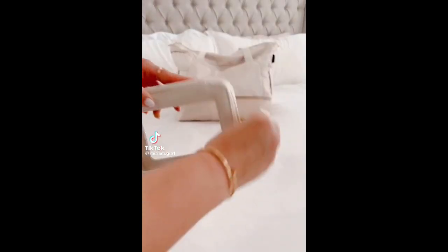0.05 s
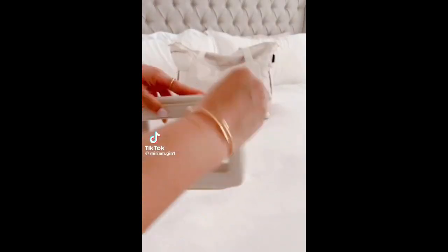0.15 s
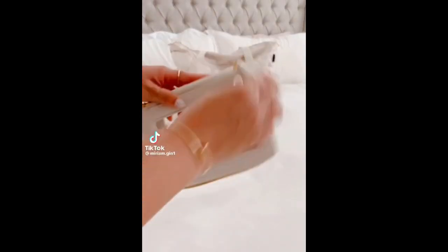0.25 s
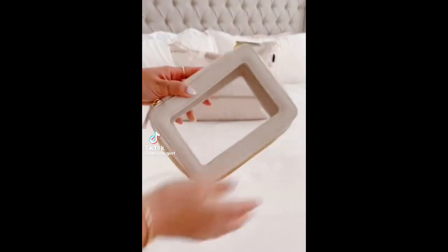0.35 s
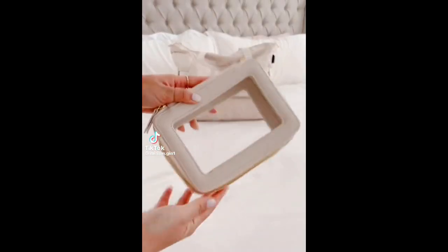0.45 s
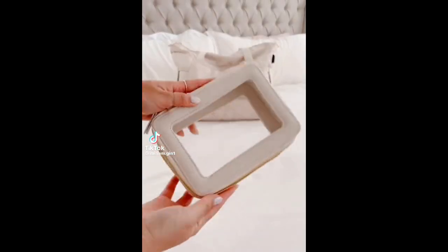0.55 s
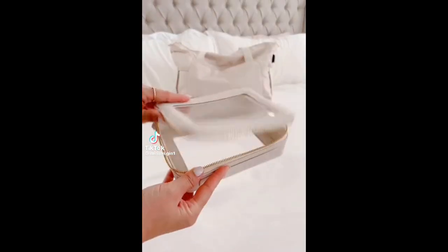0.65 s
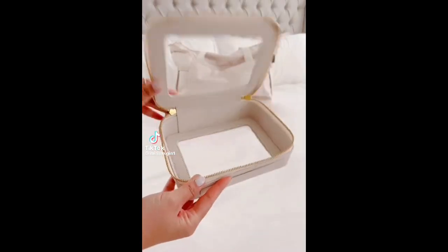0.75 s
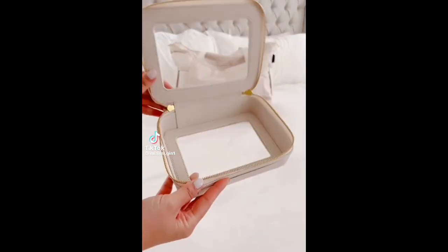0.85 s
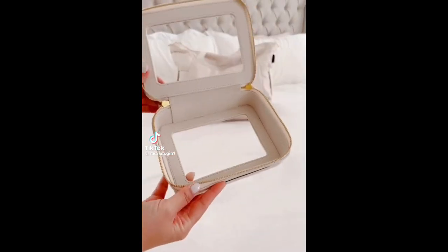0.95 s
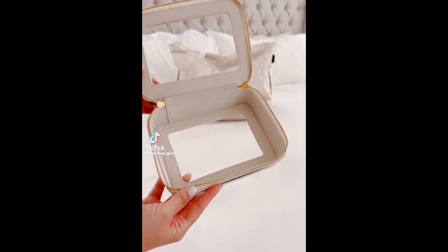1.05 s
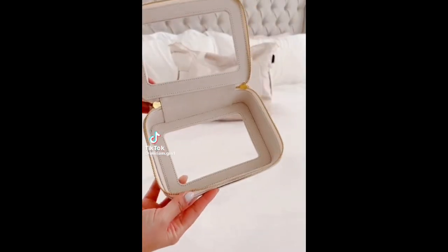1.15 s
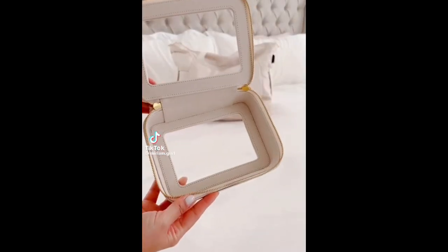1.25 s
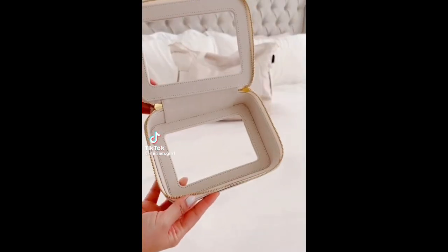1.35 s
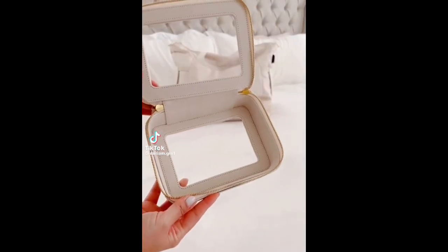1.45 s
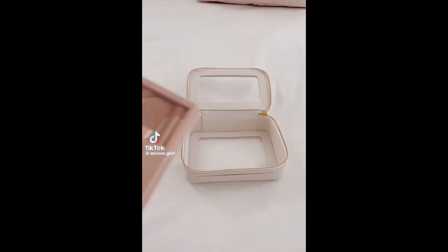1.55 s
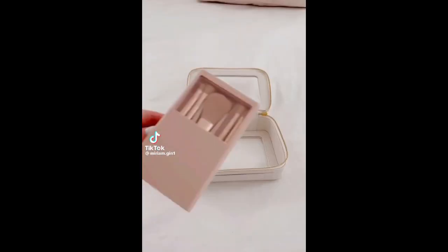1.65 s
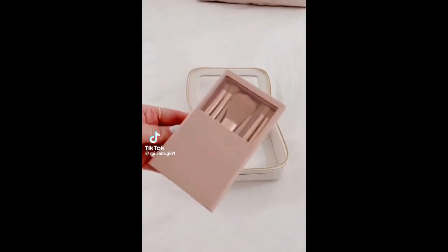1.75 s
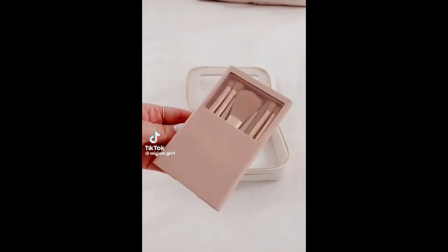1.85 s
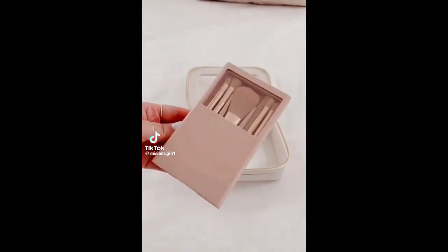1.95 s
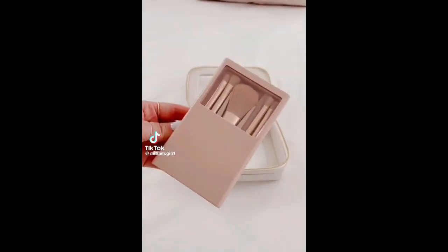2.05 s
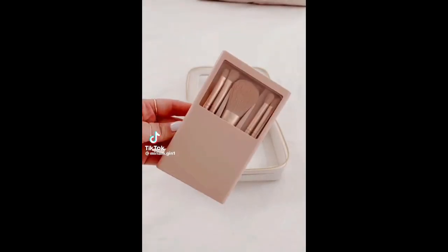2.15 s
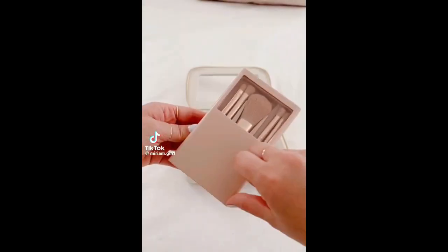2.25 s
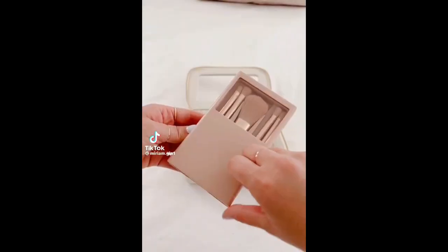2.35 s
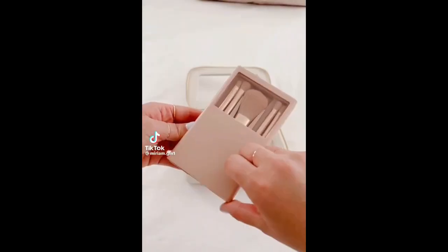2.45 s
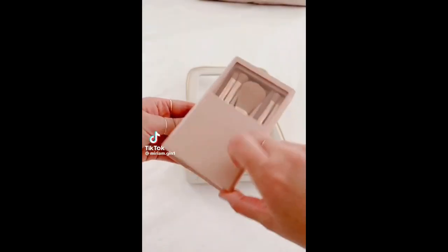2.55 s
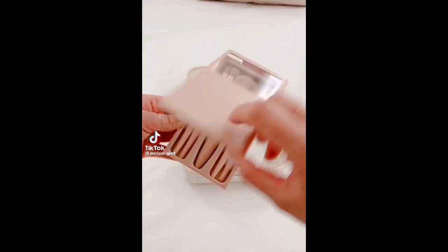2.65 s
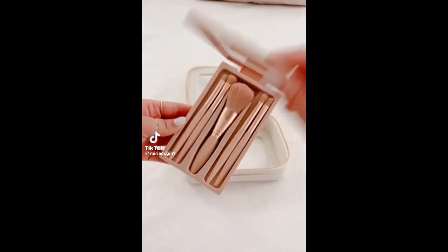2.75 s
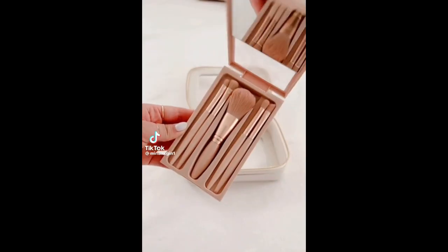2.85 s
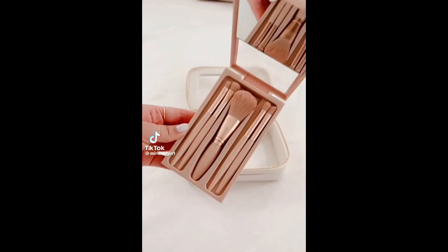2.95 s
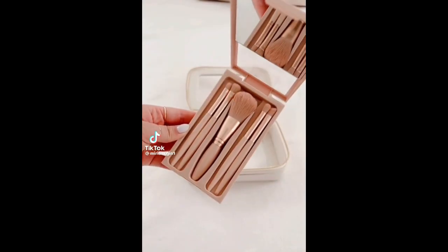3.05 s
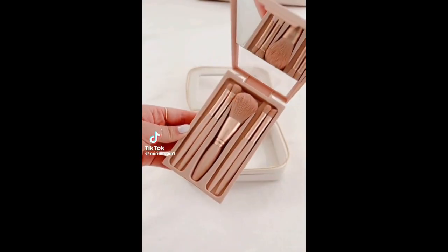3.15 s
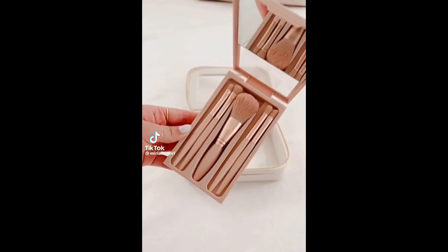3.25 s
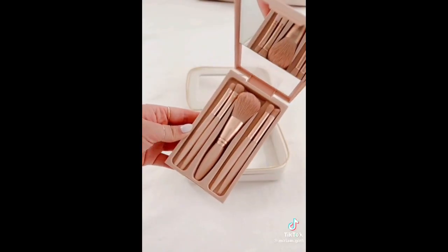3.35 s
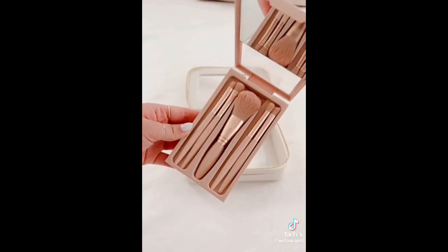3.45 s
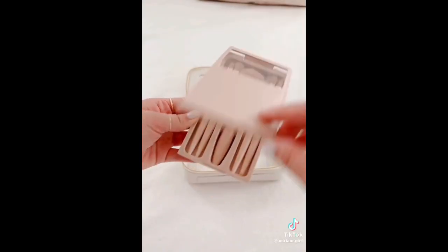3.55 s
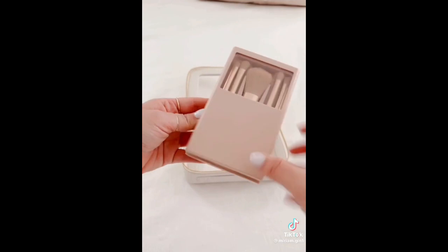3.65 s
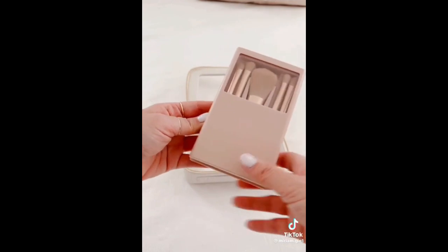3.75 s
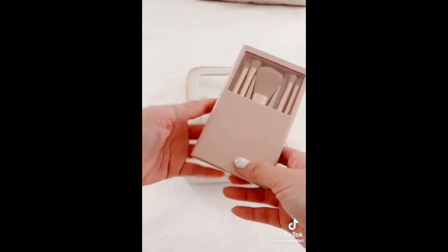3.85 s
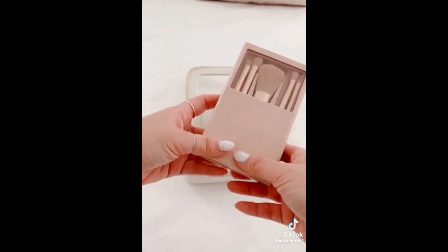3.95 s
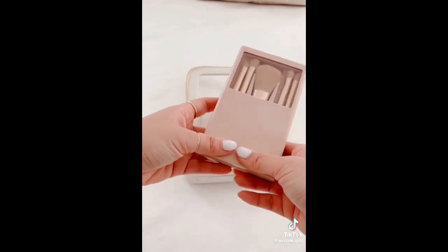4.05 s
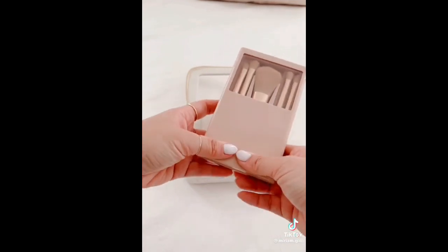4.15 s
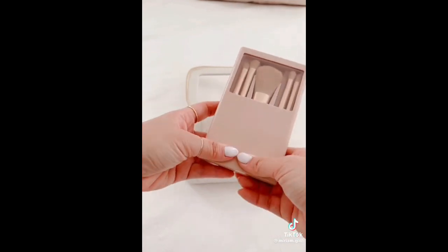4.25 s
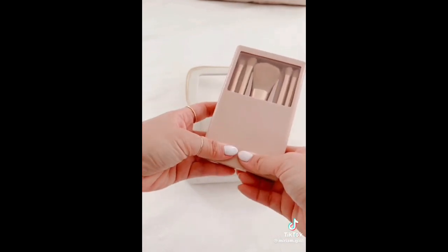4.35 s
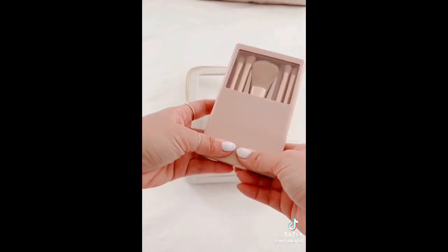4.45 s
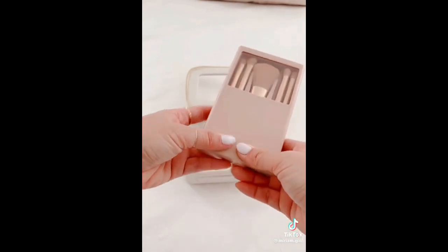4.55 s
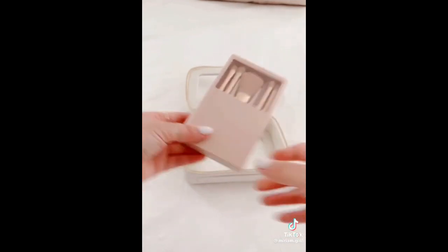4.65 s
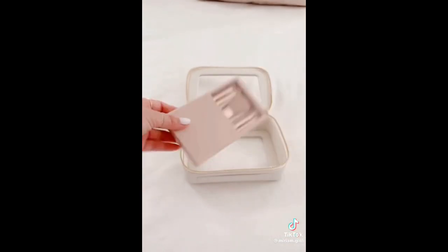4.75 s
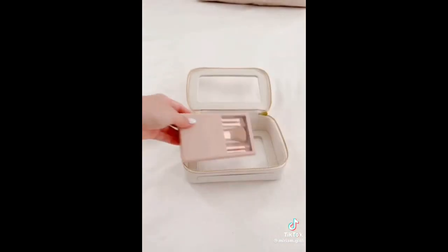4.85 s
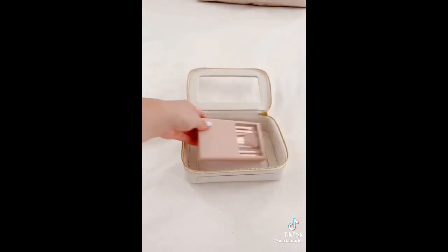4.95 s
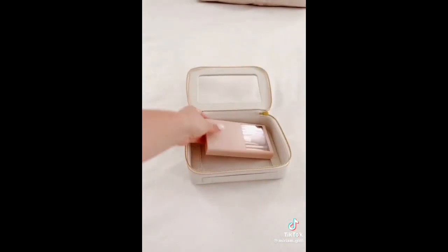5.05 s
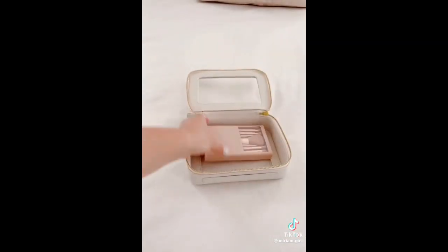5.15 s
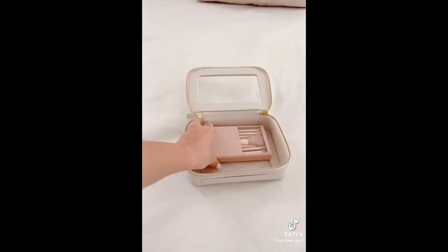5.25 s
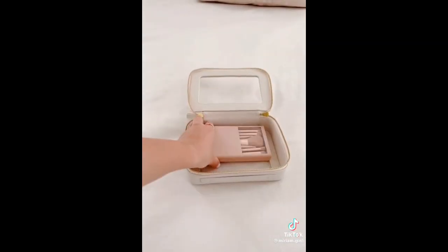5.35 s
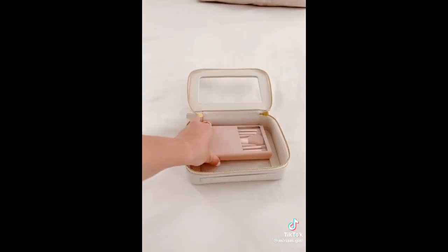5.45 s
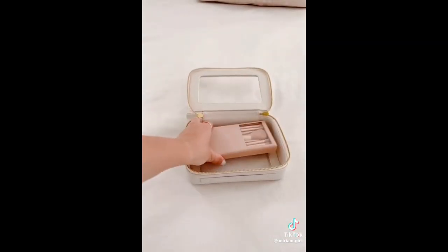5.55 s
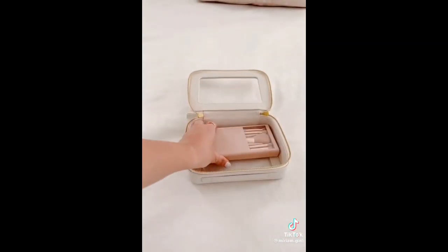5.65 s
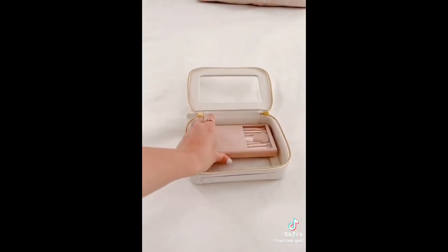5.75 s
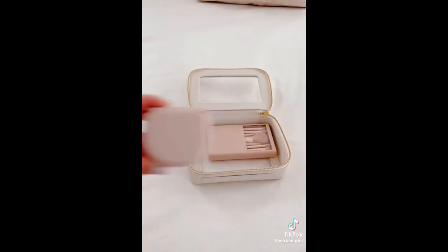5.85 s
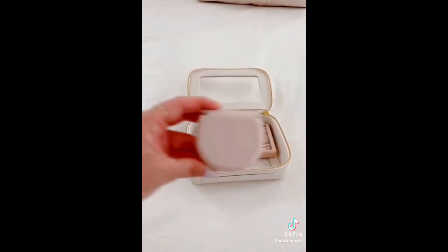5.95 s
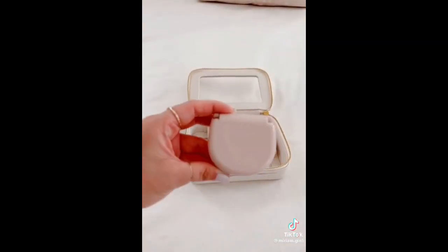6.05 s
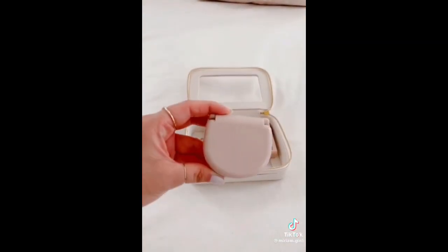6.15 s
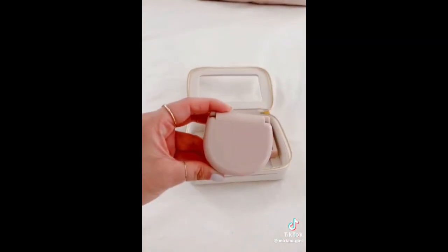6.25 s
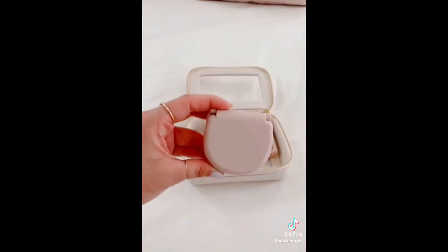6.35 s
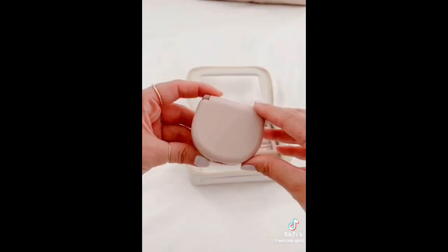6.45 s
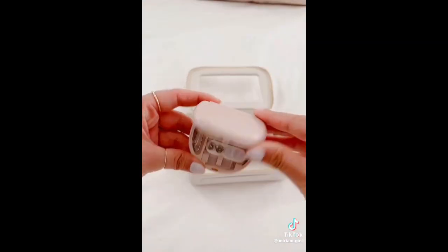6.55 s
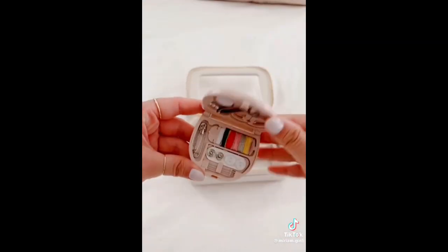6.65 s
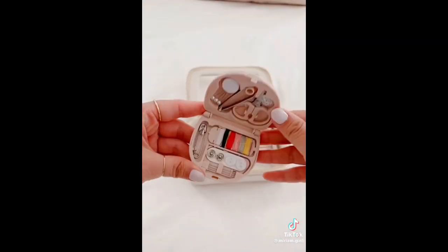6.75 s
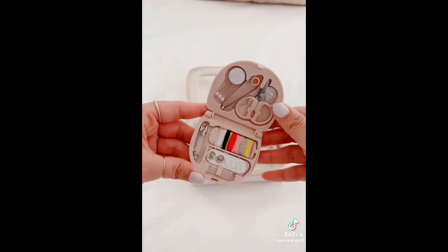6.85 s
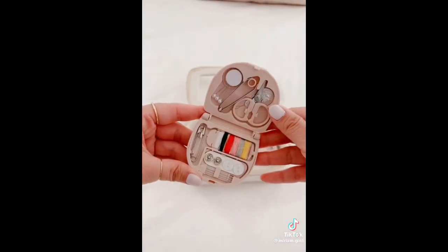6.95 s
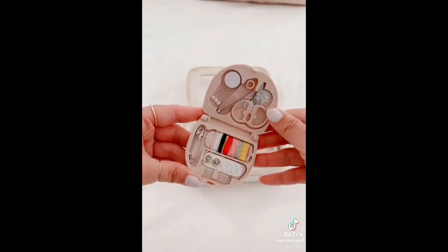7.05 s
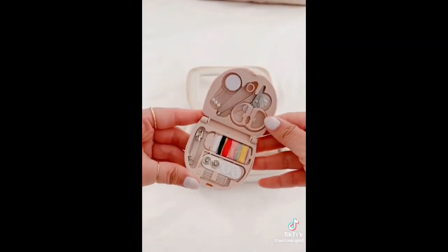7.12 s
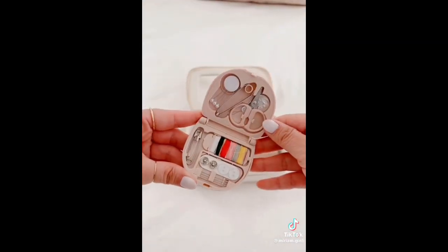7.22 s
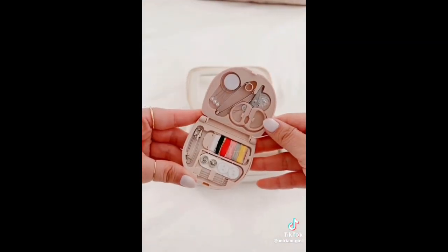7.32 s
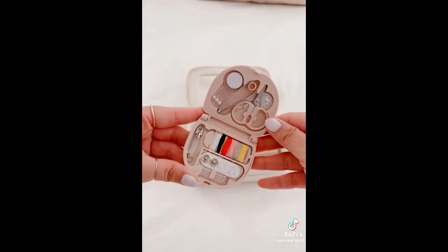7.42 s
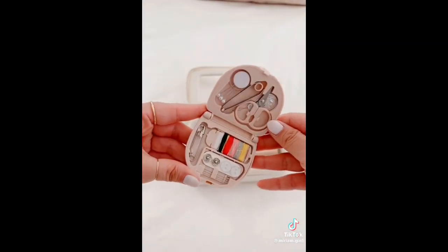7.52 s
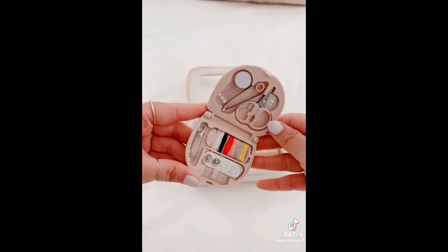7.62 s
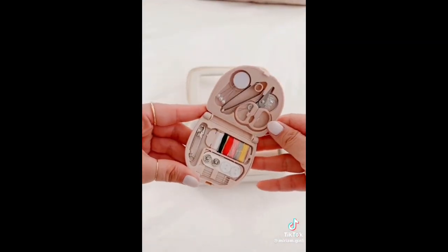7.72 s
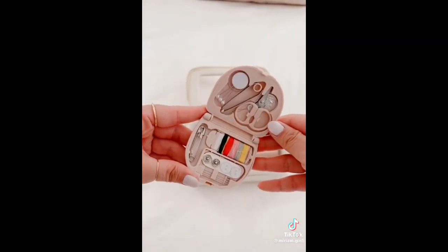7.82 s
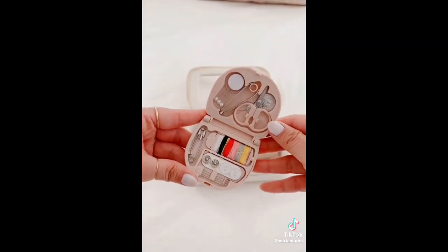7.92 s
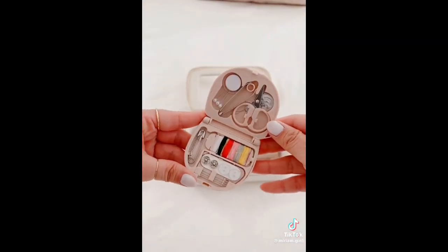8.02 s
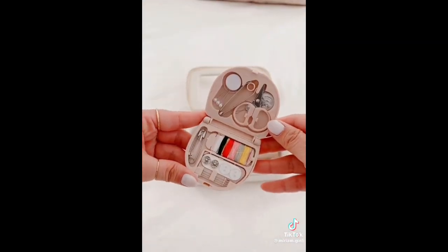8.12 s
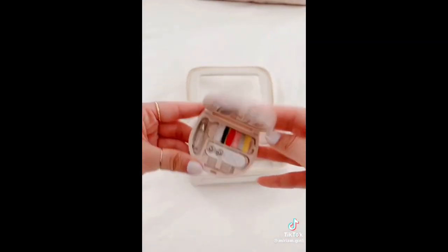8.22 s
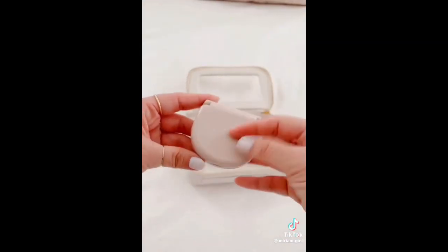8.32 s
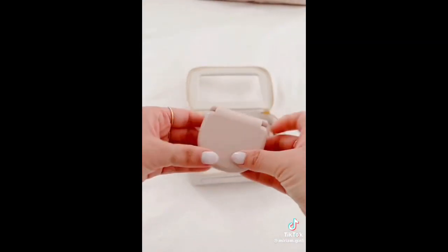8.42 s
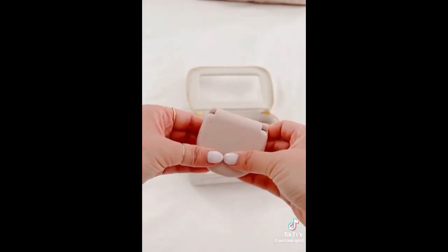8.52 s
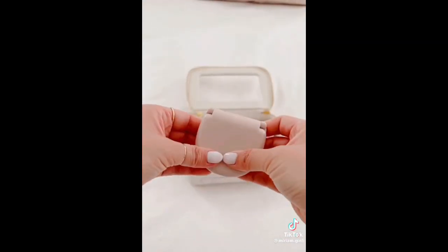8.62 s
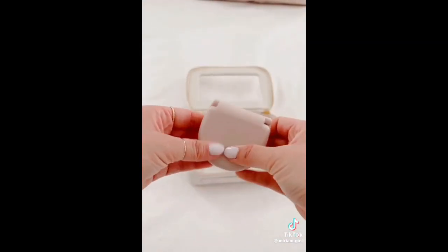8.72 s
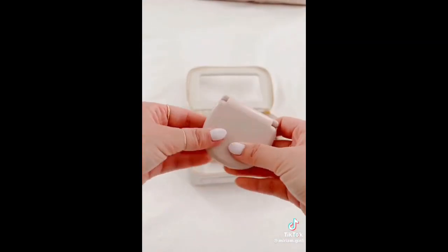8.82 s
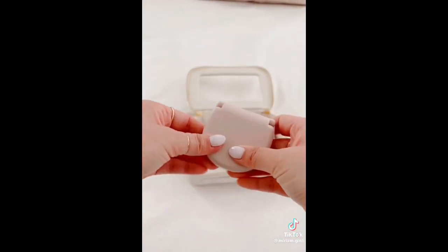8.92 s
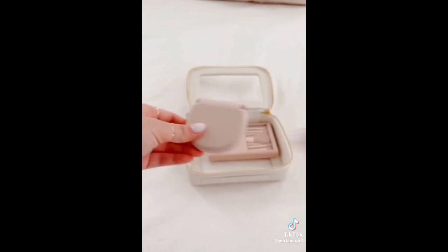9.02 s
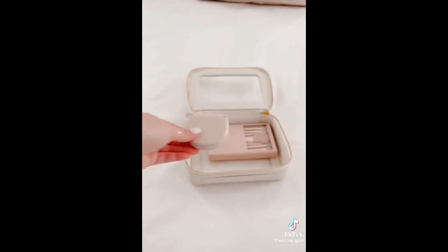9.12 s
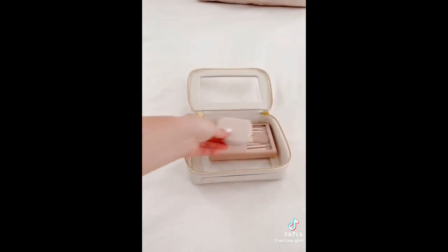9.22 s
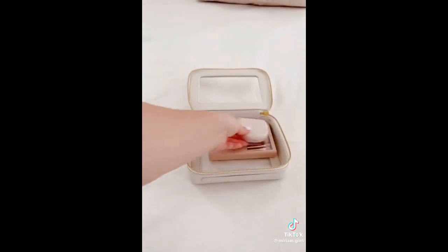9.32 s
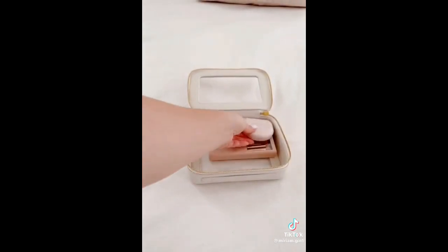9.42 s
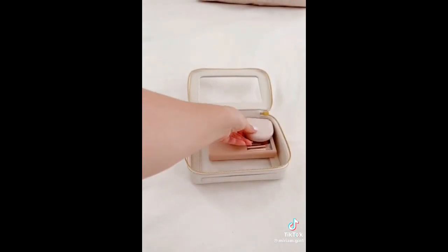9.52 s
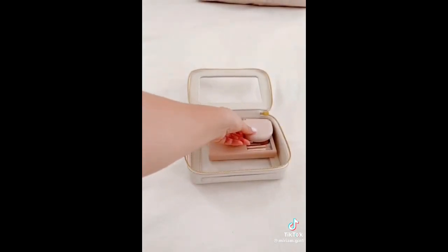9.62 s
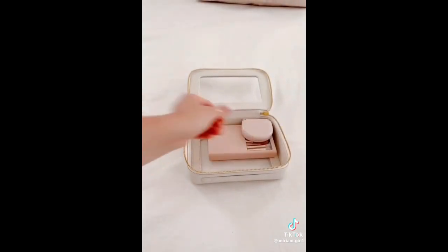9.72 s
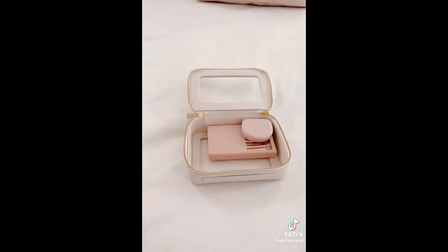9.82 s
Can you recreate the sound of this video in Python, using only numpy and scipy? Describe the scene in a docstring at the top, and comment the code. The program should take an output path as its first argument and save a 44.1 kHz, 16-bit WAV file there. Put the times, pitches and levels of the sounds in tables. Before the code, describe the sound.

Close in a soft-furnished bedroom, fingers rub and tap a padded pouch. A hollow plastic box clicks, snaps loudly, gives a tiny thin squeak, then knocks and thumps into the pouch. After a quiet pause, a small kit shuts with a crisp snap and is set down softly. Faint hiss, uneven rumble and wavering hum continue, with barely audible hoarse yaps far away.

```python
"""For ten seconds a room hisses, with an uneven rumble, a wavering hum and faint far yaps of shaped noise.
A soft zipped pouch is opened on a bed; then a plastic brush box is held, opened (with a thin squeak near
4 s), snapped shut and laid inside. A small round kit is opened, shut and laid inside in turn.
Rubs, slides and clicks are bursts of noise that ring the thing in hand; soft pushes thump the mattress.
The level dips briefly, twice in a row, at seven moments along the way."""
import sys
import numpy as np
from scipy import signal
from scipy.fft import rfft, irfft
from scipy.io import wavfile
from scipy.ndimage import uniform_filter1d

SR = 44100
rng = np.random.default_rng(int(sys.argv[2]) if len(sys.argv) > 2 else 0)


def generate_wav(sig):
    """Save sig (samples, or channels by samples) to the path in sys.argv[1] as 16-bit PCM at SR."""
    pcm = np.round(np.clip(np.atleast_2d(sig).T, -1, 1) * 32767).astype(np.int16)
    wavfile.write(sys.argv[1], SR, pcm)


N = 435708
T = np.arange(N) / SR   # time in seconds

# The room's changing levels. Each row: time in seconds, rumble in dB, hum in dB.
ROOM = [(0.0, -51, -45), (0.3, -55, -66), (1.51, -67, -60.5), (1.92, -55, -57.5), (2.36, -58, -63),
        (2.89, -78, -48.5), (3.33, -51, -51), (3.66, -54.5, -55.5), (4.04, -55.5, -50.5),
        (4.43, -55, -63.5), (4.76, -55.5, -66), (5.17, -48.5, -66), (5.64, -54, -56.5), (6.71, -68.5, -75),
        (7.18, -75.5, -58.5), (7.4, -67.5, -71), (9.05, -66.5, -61.5), (9.88, -65, -70)]
# Tone colour of the hiss. Each row: frequency in Hz, relative level in dB per Hz.
HISS_COLOUR = [(59, -34), (100, -3), (166, -6), (254, -5), (300, -4.5), (379, -12), (469, -12), (521, -16),
               (715, -17.5), (942, -19.5), (1380, -22), (2660, -25), (9060, -36), (14400, -37.5),
               (15700, -37)]
HISS_DB = -56.5
# Peaks of the hum. Each row: frequency in Hz, width in Hz of each filter pass, relative level in dB.
HUM_PEAKS = [(58, 21, -3.5), (121.7, 2.9, 7.5)]

# Faint hoarse yaps far off, perhaps a small dog. Each row: start in seconds, level in dB.
YAPS = [(0.59, -64), (1.4, -57), (2.28, -64.5), (6.2, -57.5), (6.589, -55.5), (7.215, -58), (7.839, -58.5),
        (9.108, -57.5), (9.83, -64)]
# Resonances of a yap, the lower ones later as the mouth closes.
# Each row: frequency in Hz, width in Hz of each filter pass, relative level in dB, delay in ms.
YAP_TONES = [(1610, 150, 2, -2), (1360, 260, -1.5, 20), (677, 90, -7, 37), (2000, 780, -9.5, 1),
             (3830, 220, -12, 13)]
YAP_RISE_S, YAP_FALL_S = 0.0042, 0.028

BEDROOM_T60_S, BEDROOM_DB = .22, -21.5   # time to fade by 60 dB, level of the tail

# Low thumps through the mattress.
# Each row: start in seconds, level in dB before the soft start, pitch in Hz.
THUMPS = [(3.58, -25.5, 158), (4.184, -26.5, 105), (4.253, -24, 220), (4.51, -33, 96.9),
          (4.962, -27, 133.9), (5.021, -23, 111), (5.308, -39, 80), (5.553, -15.5, 115), (5.72, -32.5, 84),
          (8.21, -31, 205), (9.489, -25, 240), (9.838, -43, 60)]
THUMP_RISE_S, THUMP_T60_S = .003, .07

# A thin arched squeak from the box: middle and half length, top pitch and its sag at the ends, level.
SQUEAK_S, SQUEAK_HALF_S = 3.995, .08
SQUEAK_TOP_HZ, SQUEAK_SAG_HZ, SQUEAK_DB = 11950, 1250, -61

# Four bands of contact sound: thud, body, clack, fizz. Each row: low edge in Hz, high edge in Hz.
BANDS_HZ = [(230, 850), (850, 2500), (2500, 6000), (6000, 13000)]
# Ringing modes of the things in hand.
# Each row: frequency in Hz, time to fade by 60 dB in ms, level in dB over the plain contact sound.
POUCH = [(296, 10.5, 16.5), (534, 53, 20), (790, 56, 8), (1180, 20, 3), (1887, 51, 6), (4550, 6.1, -4),
         (10840, 1.2, 8), (14100, 1.4, 15)]
BOX = [(404.3, 50, 3.5), (878, 26, 2.6), (1208, 71, 14), (1404, 16, 7.5), (1670, 9.8, 5.4), (1868, 30, 3.4),
       (2807, 9.5, 2.5), (4600, 23, 1.9), (10750, 5.9, 2.4), (14430, 3.2, 12)]
BOX_HELD = [(1250, 31, 13.7), (1520, 6.2, 9.2), (2100, 30, 3.8), (3230, 4.9, 3.5), (6270, 10, 2.2)]   # gripped by one corner
BOX_SHUT = [(460, 55, 4.5), (544, 240, 4.2), (746, 60, 3.2), (1392, 26, 2.9), (2260, 22, 1.1),
            (2950, 7.6, 6.3), (4600, 3.2, 3.1), (7030, 6, 1.8), (11400, 2.8, 9.4), (14200, 3.3, 6)]
BOX_IN_POUCH = [(362, 37, 2.13), (744, 7.7, 5), (1640, 17.3, 17.3), (1703, 33, 10.3), (1775, 41, 4.7),
                (3110, 4, 9), (3840, 5.3, 5.2), (15500, 3.5, 2.3)]
KIT = [(1575, 3, 1), (2190, 2.9, 11), (3850, 14, 1), (4060, 2.5, 7.7), (5740, 5.8, 4), (8340, 6.5, 1.1),
       (10800, 2.9, 5.4), (14400, 0.75, 7)]
KIT_IN_POUCH = [(330, 18, 3.4), (397, 18, 11), (642, 27, 8.2), (827, 71, 6.3), (1666, 27, 7.7),
                (3310, 1.8, 3.2), (10650, 11, 4.4), (14400, 3.8, 7)]
# What is in hand when; the last row marks the end. Each row: start in seconds, modes that ring.
IN_HAND = [(0, POUCH), (1.5, BOX_HELD), (3.4, BOX), (4.1, BOX_SHUT), (4.86, BOX_IN_POUCH), (5.9, KIT),
           (9.2, KIT_IN_POUCH), (9.88, None)]
# Contact colour, in the same order of things.
# Each row: fizz of a rub in dB relative to its clack, thud of a click in dB relative to its body.
FEEL = [(4, -22), (-10.5, -33), (-9.5, -32.5), (-6.5, -6), (-5, -16.5), (1.5, -12), (-1, -2.5)]

# Rubs and rattles.
# Each row: peak time in seconds, length in ms, thud in dB, body in dB, clack (bright edge) in dB.
RUBS = [(0.022, 32, -31.5, -35.5, -45.5), (0.055, 27, -33.5, -31, -44), (0.084, 7.5, -25.5, -40, -44.5),
        (0.114, 9.5, -49, -39, -52), (0.178, 18, -40, -67, -55.5), (0.463, 11, -52, -53, -60),
        (0.495, 5.5, -40, -46.5, -63), (0.748, 1.5, -57, -49, -59), (1.549, 6.5, -67, -32, -41),
        (1.564, 6, -45, -56, -45), (1.685, 5, -71, -46.5, -58.5), (2.559, 2, -55, -42, -41),
        (2.576, 8, -48, -69, -40), (2.59, 6.5, -43, -68, -37), (3.574, 11.5, -26, -18.5, -21),
        (3.589, 7.5, -22, -9.5, -26), (3.611, 4.5, -53, -35, -18.5), (3.632, 14, -43, -20, -28),
        (3.654, 11, -49, -21.5, -31.5), (3.776, 10.5, -29, -16.5, -21.5), (3.902, 2, -56, -41.5, -45.5),
        (3.916, 8, -71, -39.5, -47.5), (4.186, 6.5, -62, -39, -55), (4.257, 7, -26, -41, -28.5),
        (4.27, 9, -15.5, -16, -17), (4.298, 13.5, -23.5, -27.5, -29), (4.345, 28, -39.5, -47, -47.5),
        (4.482, 11, -57, -69, -60), (4.555, 16, -51, -37, -45), (4.734, 24, -57, -50, -65),
        (4.779, 7, -57, -48.5, -54), (4.911, 2, -27, -48, -43.5), (4.929, 8, -34.5, -62, -70),
        (4.969, 15, -27, -29, -43.5), (5.034, 11.5, -27, -19.5, -30.5), (5.06, 14.5, -30, -32.5, -56),
        (5.117, 2, -45, -31, -49), (5.138, 10.5, -36.5, -37.5, -59), (5.179, 22, -45.5, -50, -67),
        (5.252, 4.5, -60, -37, -53), (5.27, 14, -50, -53, -68), (5.322, 16, -39, -40, -55),
        (5.394, 25, -48, -52, -68), (5.45, 5, -36, -26.5, -50), (5.474, 23, -45, -42.5, -60),
        (5.559, 15, -33, -38, -48.5), (5.645, 39, -48.5, -50, -68), (5.721, 7.5, -37, -33, -51),
        (5.74, 13.5, -39.5, -49, -60), (6.5, 27.5, -72.5, -72, -64.5), (6.576, 17, -69.5, -68.5, -63),
        (6.739, 12.5, -77, -67, -67), (7.05, 40, -77.5, -80.5, -67.5), (7.37, 18, -73.5, -74, -70),
        (8.137, 5.5, -66.5, -45, -52), (8.163, 28, -72, -59, -55), (8.217, 6.5, -40, -38, -33.5),
        (8.29, 7.5, -46, -40.5, -45.5), (8.33, 7, -69, -47, -59), (8.409, 9, -61, -55, -60),
        (8.449, 7, -41, -31.5, -32.5), (8.464, 5.5, -41.5, -38, -39.5), (8.497, 4.5, -63.5, -61, -55),
        (8.834, 8, -59, -68, -62), (8.702, 4, -50.5, -62, -59.5), (8.91, 8, -49.5, -59, -55),
        (9.323, 4, -48, -39.5, -49.5), (9.336, 4.5, -22.5, -28.5, -45), (9.366, 11.5, -46, -52.5, -61),
        (9.5, 9.5, -17.5, -25.5, -30.5), (9.539, 9, -41.5, -46, -44), (9.845, 41, -87, -63, -60.5)]
RISE_SHARE, FALL_SHARE = 0.8, 1.1   # share of the length from -6 dB to the peak, and back to -6 dB
# Fingers sliding on the thing in hand, one list per stretch. Each row: time in seconds, body in dB.
SLIDING = [
    [(0.0, -38), (0.06, -31), (0.152, -56), (0.202, -64), (0.438, -68), (0.604, -56.5), (0.95, -73)],
    [(2.2, -60), (2.528, -74.5), (2.71, -67), (2.9, -70)],
    [(4.35, -62), (4.774, -89), (4.972, -56), (5.132, -62), (5.262, -77), (5.626, -76), (5.82, -54.5)],
    [(6.38, -69), (6.8, -74.5), (7.2, -80)],
    [(8.15, -59), (8.208, -49), (8.31, -80), (8.34, -57), (8.458, -80), (8.66, -71), (9.1, -71.5)],
    [(9.3, -60), (9.548, -80), (9.88, -61)],
]
SLIDE_CLACK_DB, SLIDE_FIZZ_DB = -7, -7   # relative to the body
# Hard contacts. Each row: time in seconds, body in dB, fizz in dB relative to the body.
CLICKS = [(0.171, -29, -8), (0.1725, -27.5, -32), (0.2206, -44, 6.5), (0.3924, -48, 9), (0.4523, -57, -12),
          (0.744, -38.5, -12), (1.538, -26.5, -22), (1.5455, -13.5, -20), (1.549, -19.5, -28),
          (1.564, -17.5, -25), (1.6821, -36, -26), (1.8618, -44, -24), (1.988, -32, -44),
          (2.0576, -41.5, -23), (2.086, -39.5, -32), (2.5601, -26.5, -7.5), (2.5926, -32.5, 10),
          (3.5963, -11, -30), (3.6102, 4, -36), (3.6175, -12.5, -9), (3.9118, -30, -22),
          (4.1412, -43, -7.5), (4.181, -26, -22), (4.1884, -13.5, -49), (4.2011, -43.5, -23),
          (4.4782, -40, -28), (4.5405, -39, -12), (4.556, -45, -10.5), (4.7388, -38, -21), (4.78, -49, -8),
          (4.908, -30, -1), (4.9659, -13, -20), (5.0356, -3, -36), (5.1162, -20, -18.5),
          (5.1423, -22.5, -25), (5.1749, -26, -37), (5.1832, -28, -40), (5.2501, -21.5, -25),
          (5.2726, -32, -28), (5.2942, -31, -26), (5.3686, -37, -7), (5.449, -32, -9),
          (5.4508, -23.5, -12.5), (5.512, -39, -26), (5.5403, -29, -13), (5.6307, -25.5, -37),
          (5.672, -35, -24), (5.718, -15, -25.5), (5.781, -34, -19), (6.9463, -53, -16.5),
          (8.137, -37, -15), (8.1594, -37, -10.5), (8.2109, -15.5, -13), (8.2126, -8, -14.5),
          (8.216, -17.5, 2.5), (8.2886, -20.5, -24), (8.3244, -45.5, 11), (8.401, -41.5, -13),
          (8.4467, -14.5, -12), (8.6055, -44.5, -7), (8.702, -43, -3), (8.751, -47.5, -11),
          (8.8217, -53, 12.5), (8.911, -42, 2), (9.0155, -42.5, 0.5), (9.3359, -20.5, -5.5),
          (9.5382, -39.5, 12), (9.811, -47.5, -3)]

# Brief paired dips in level: first dip starts in seconds, lengths of both dips in ms, depths in dB.
DIPS_S = [.551, 1.487, 2.189, 5.793, 6.372, 8.119, 9.79]
DIP_MS = [11.7, 17.3, 11.5, 7.2, 6, 10.2, 6.8]
DIP_DB = [-20, -26]
SECOND_DIP_S = .024   # after the first one starts
CUTOFF_HZ = 16200


def from_db(db):
    """Gain of a level."""
    return 10 ** (np.asarray(db) / 20)


def rms_one(x):
    """Scale to unit power."""
    return x / np.sqrt(np.mean(x ** 2) + 1e-20)


def band(x, low_hz, high_hz):
    """Keep mostly the sound between two frequencies (Butterworth band-pass)."""
    return signal.sosfilt(signal.butter(2, [low_hz, high_hz], "band", fs=SR, output="sos"), x)


def resonance(x, hz, width_hz):
    """Ring at one frequency: a two-pole peak with gain 1 on top."""
    r = np.exp(-np.pi * width_hz / SR)
    top = np.array([1, 0, -1]) * (1 - r * r) / 2
    return signal.lfilter(top, [1, -2 * r * np.cos(2 * np.pi * hz / SR), r * r], x)


def room_tone():
    """Steady coloured hiss, a low rumble of uneven level and a hum of resonant noise that wavers."""
    s, rumble_db, hum_db = np.transpose(ROOM)
    hz = np.arange(1, N // 2 + 2) * SR / N
    colour_hz, colour_db = np.transpose(HISS_COLOUR)
    colour = from_db(np.interp(np.log(hz), np.log(colour_hz), colour_db))
    hiss = rms_one(irfft(rfft(rng.standard_normal(N)) * colour, N))
    noise = rng.standard_normal((2, N))
    rumble = rms_one(band(noise[0], 15, 99))
    hum = np.zeros(N)
    for peak_hz, width_hz, db in HUM_PEAKS:
        hum += from_db(db) * resonance(resonance(noise[1], peak_hz, width_hz), peak_hz, width_hz)
    hum = rms_one(hum)
    rumble_level = from_db(np.interp(T, s, rumble_db))
    hum_level = from_db(np.interp(T, s, hum_db))
    return from_db(HISS_DB) * hiss + rumble_level * rumble + hum_level * hum


def yaps():
    """Each yap is a short swell of rough noise in a few resonances."""
    out = np.zeros(N)
    for hz, width_hz, tone_db, delay_ms in YAP_TONES:
        level = np.zeros(N)
        for s, db in YAPS:
            t = np.clip(T - s - delay_ms / 1000, 0, 1)
            rise = 1 - np.exp(-t / YAP_RISE_S)
            level += from_db(db) * rise * np.exp(-(t / YAP_FALL_S / 2) ** 2)
        voice = resonance(resonance(rng.standard_normal(N), hz, width_hz), hz, width_hz)
        out += from_db(tone_db) * level * rms_one(voice)
    return out


def bedroom(x):
    """A short soft tail: dying noise, dulled by bedding."""
    t = T[:SR // 2]
    fade = from_db(-60 * t / BEDROOM_T60_S) * (t > .004)   # starts after a 4 ms gap
    tail = band(rng.standard_normal(len(t)), 300, 9000) * fade
    return signal.fftconvolve(x, tail / np.linalg.norm(tail))[:N]


def thumps():
    """Each soft push swells in a few milliseconds and rings low and short."""
    out, t = np.zeros(N + SR), T[:SR // 2]
    rise = (1 - np.exp(-t / THUMP_RISE_S)) ** 2
    for s, db, hz in THUMPS:
        level = from_db(db - 60 * t / THUMP_T60_S) * rise
        out[round(s * SR):][:len(t)] += level * np.sin(2 * np.pi * hz * t)
    return out[:N]


def squeak():
    """A slightly rough whistle whose pitch and level rise and fall."""
    arch = np.clip((T - SQUEAK_S) / SQUEAK_HALF_S, -1, 1) ** 2   # 0 in the middle, 1 at the ends
    roughness = 1 + .5 * rms_one(band(rng.standard_normal(N), 24.4, 200))
    level = from_db(SQUEAK_DB) * (1 - arch) * roughness
    phase = 2 * np.pi * np.cumsum(SQUEAK_TOP_HZ - SQUEAK_SAG_HZ * arch) / SR
    return np.sqrt(2) * level * np.sin(phase)


def feel(s):
    """Contact colour of the thing in hand at a moment."""
    starts = [start for start, _ in IN_HAND]
    return FEEL[np.searchsorted(starts, s, side="right") - 1]


def body(x, modes, grip_db=0):
    """Plain contact sound plus modes whose strengths drift at random, each on its own, as the grip shifts."""
    out = x.copy()
    hold = np.arange(len(x)) / 2000   # a new random strength about every 45 ms
    for hz, t60_ms, db in modes:
        knots = grip_db * rng.standard_normal(len(x) // 2000 + 2)
        grip = from_db(np.interp(hold, np.arange(len(knots)), knots))
        width_hz = np.log(1000) / np.pi / (t60_ms / 1000)   # the longer the ring, the narrower the peak
        out += from_db(db) * resonance(grip * x, hz, width_hz)
    return out


def grains(per_s, spread_db):
    """Tiny stick-slip impacts of very uneven size over a smooth scratch; unit power."""
    sizes = from_db(spread_db * np.minimum(rng.exponential(1, N), 4)) * rng.choice([-1, 1], N)
    impacts = sizes * (rng.random(N) < per_s / SR)
    return rms_one(impacts + 0.32 * rng.standard_normal(N))


def rub_force():
    """Contact strength per band: each rub swells and dies, and sliding fingers add their power."""
    power = np.zeros((4, N))
    for s, length_ms, thud_db, body_db, clack_db in RUBS:
        near = slice(max(round((s - .15) * SR), 0), round((s + .3) * SR))
        lengths = (T[near] - s) * 1000 / max(length_ms, 1)   # distance from the peak, in rub lengths
        shape_db = -6 * np.where(lengths < 0, -lengths / RISE_SHARE, lengths / FALL_SHARE) ** 1.3
        levels_db = np.array([thud_db, body_db, clack_db, clack_db + feel(s)[0]])
        power[:, near] += from_db(levels_db[:, None] + shape_db) ** 2
    # fingers brush in short uneven strokes
    flutter = from_db(1.43 * rms_one(band(rng.standard_normal(N), 6.3, 27.0)))
    tilt_db = np.array([[0], [SLIDE_CLACK_DB], [SLIDE_FIZZ_DB]])
    for rows in SLIDING:
        s, db = np.transpose(rows)
        fade = np.clip(np.minimum(T - s[0], s[-1] - T) / 0.09, 0, 1)   # 90 ms at both ends
        strength = flutter * from_db(np.interp(T, s, db) + tilt_db)
        power[1:] += fade * strength ** 2   # no thud
    return np.sqrt(power)


def click_force():
    """Each hard contact is one blow and a chatter that dies within a few milliseconds."""
    force, steps = np.zeros((4, N)), np.arange(120)
    energy = np.sqrt(0.00034 * SR)   # the level holds for about this many seconds
    chatter_shape = (1 - np.exp(-steps / 2.0)) * np.exp(-steps / 35.0)
    chatters = rng.standard_normal((len(CLICKS), 120))
    for (s, db, fizz_db), chatter in zip(CLICKS, chatters):
        # the clack lies between body and fizz
        levels_db = db + np.array([feel(s)[1], 0, 0.65 * fizz_db, fizz_db])
        blow = (steps == 8) + .8 * chatter * chatter_shape
        place = round(s * SR) - 8 + steps
        force[:, place] += from_db(levels_db)[:, None] * energy * blow / np.linalg.norm(blow)
    return force


def handling():
    """Rubs and clicks excite whatever is in hand; each band passes unit noise at unit power."""
    force = rub_force() * grains(per_s=5400.0, spread_db=2.5) + click_force()
    out, unit = np.zeros(N + SR), signal.unit_impulse(8192)
    for (start, modes), (end, _) in zip(IN_HAND, IN_HAND[1:]):
        i, j = round(start * SR), round(end * SR)
        contact = np.zeros(j - i + 8192)   # room for the ringing to die away
        for k, (f, edges) in enumerate(zip(force, BANDS_HZ)):
            strength = np.linalg.norm(body(band(unit, *edges), modes))
            padded = np.pad(f[i:j], (0, 8192)) + 1e-18
            # neighbouring bands alternate in sign so that they join without a hole
            contact += (-1) ** k * band(padded, *edges) / strength
        out[i:j + 8192] += body(contact, modes, grip_db=2.0)
    return out[:N]


def scene():
    """Handling, thumps and squeak with their soft tail, in the room with the far yaps."""
    close = handling() + thumps() + squeak()
    return (close + from_db(BEDROOM_DB) * bedroom(close) + room_tone() + yaps())[None]


def record(dry):
    """The level dips briefly in pairs, peaks hit a ceiling and the highest treble is cut."""
    gain_db = np.zeros(N)
    for first_s, ms in zip(DIPS_S, DIP_MS):
        for s, db in zip((first_s, first_s + SECOND_DIP_S), DIP_DB):
            gain_db[round(s * SR):round((s + ms / 1000) * SR)] = db
    gain = uniform_filter1d(from_db(gain_db), size=60)   # softens the edges of the dips
    clipped = np.clip(dry * gain, -.97, .97)
    return signal.sosfilt(signal.cheby2(24, 95, CUTOFF_HZ, fs=SR, output="sos"), clipped)


dry = scene()
out = record(dry)
generate_wav(out)
```